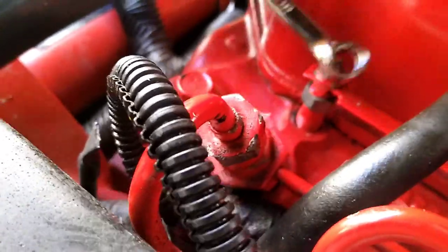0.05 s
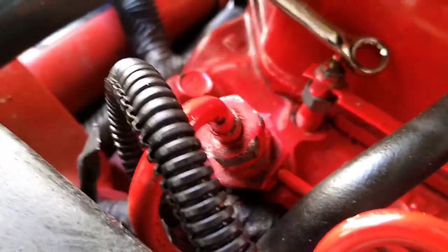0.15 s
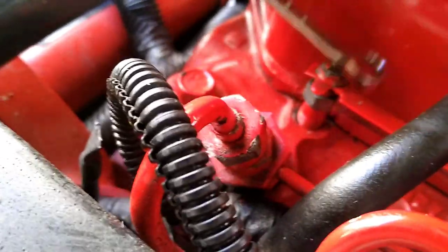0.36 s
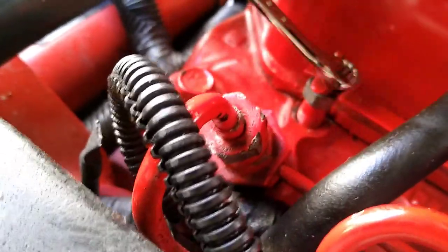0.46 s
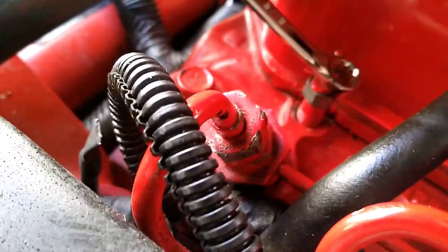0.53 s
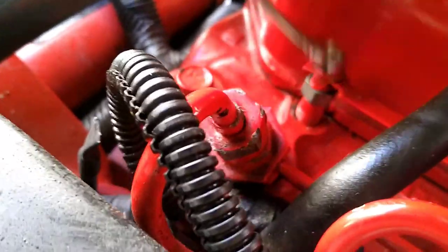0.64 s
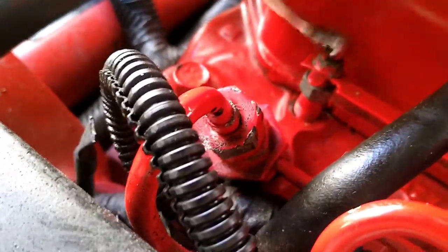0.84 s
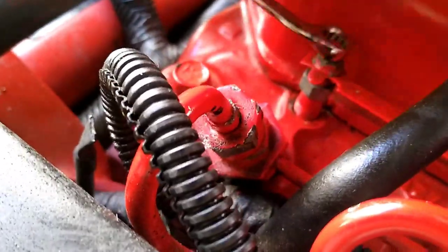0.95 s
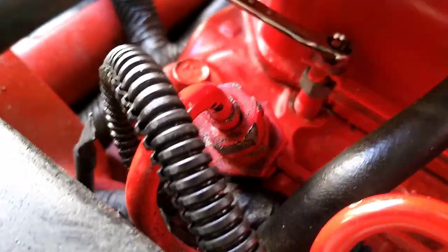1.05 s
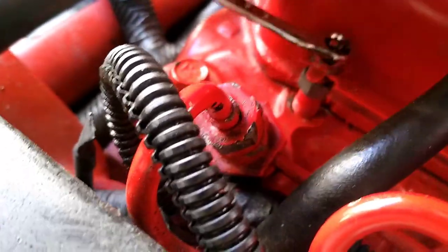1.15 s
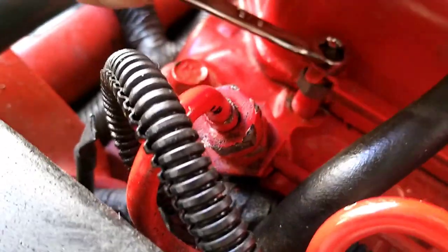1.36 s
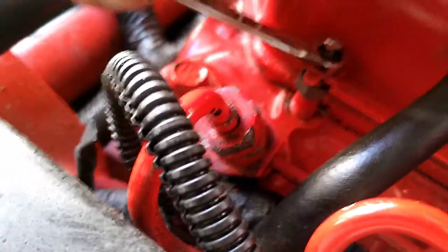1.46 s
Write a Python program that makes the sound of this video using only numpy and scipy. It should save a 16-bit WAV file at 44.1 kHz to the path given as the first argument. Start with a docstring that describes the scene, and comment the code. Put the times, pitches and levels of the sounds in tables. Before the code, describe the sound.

Hand wrench clicking on an engine nut in a boat, heard close and fairly dry; the loudest hit comes early, two moderate taps follow, then barely audible fidgeting contacts over very faint low hum and hiss.

```python
"""A small steel wrench clicks and taps on a terminal nut of an engine in a boat's cramped engine bay.
Each touch is a short chatter of contacts that rings wrench and block; the hardest tap makes the hull boom.
In mono; the direct taps stand well above the bay's brief dense tail, as from a microphone close by.
A faint low hum, rumble and microphone hiss lie underneath; the recorder cuts the top."""
import sys
import numpy as np
from scipy import signal
from scipy.fft import rfft, irfft
from scipy.io import wavfile

SR = 44100
rng = np.random.default_rng(int(sys.argv[2]) if len(sys.argv) > 2 else 0)


def output_pcm(signal):
    """Save a mono or channel-first signal as 16-bit PCM at the path in sys.argv[1].

    Samples are clipped to [-1, 1] before scaling.
    """
    pcm = np.clip(np.atleast_2d(signal).T, -1, 1) * 32767
    wavfile.write(sys.argv[1], SR, np.round(pcm).astype(np.int16))


def ratio_of_db(decibels):
    """Turn decibels (scalar or array-like) into linear amplitude factors; 0 dB maps to 1."""
    return 10 ** (np.asarray(decibels, float) / 20)


N = 66150  # 1.5 s


def rms_one(x):
    """Scales a signal to an rms of one."""
    return x / np.sqrt(np.mean(x ** 2) + 1e-20)


def at_hz(points, hz):
    """Reads a (Hz, value) curve along log frequency."""
    points = np.array(points)
    return np.interp(np.log(hz), np.log(points[:, 0]), points[:, 1])


def dying(t, t60):
    """Exponential decay that falls 60 dB in t60 seconds."""
    return ratio_of_db(-60 * t / t60)


def bands(x, gain_db):
    """Third-octave bank; x(hz) gives each band's input, gain_db(hz) its gain."""
    edges = 160 * 2 ** np.arange(0, 6.1, 1 / 3)
    total = 0
    for low, high in zip(edges, edges[1:]):
        centre = np.sqrt(low * high)
        band = signal.butter(1, [low, high], "band", fs=SR, output="sos")
        total = total + ratio_of_db(gain_db(centre)) * signal.sosfilt(band, x(centre))
    return total


def tilt_db(hz, dull_db, treble_db):
    """Colour of one touch: a slope per octave about 5 kHz and a treble shelf from 5750 Hz."""
    return -dull_db * np.log2(hz / 5000) + treble_db / (1 + (5750 / hz) ** 6)


# Colour of the contact noise before each touch's own tilt: pitch_hz, level_db
CRACK_COLOUR = [(200, -26), (500, -26), (1000, -16), (1500, -10.5), (3000, -3), (4800, -1), (6200, -9.5),
                (7300, -9), (8500, -12.5)]


def crack(t, dull_db, treble_db, chatter_ms, tail_db):
    """Dying chatter of random contacts, plus shimmer from modes too dense to tell apart; peak 1."""
    contacts_per_s, first_contact = 2500, 3
    shimmer_db, shimmer_t60_s, shimmer_rise_s = -19, 0.1, 0.002
    contacts = rng.random(len(t)) < contacts_per_s / SR
    chatter = rng.standard_normal(len(t)) * contacts * np.exp(-1000 * t / chatter_ms)
    chatter[0] = first_contact
    shimmer = rng.standard_normal(len(t)) * (1 - np.exp(-t / shimmer_rise_s)) * dying(t, shimmer_t60_s)
    # the tiny constant keeps the input from being exactly zero
    source = chatter / first_contact + ratio_of_db(shimmer_db + tail_db) * shimmer + 1e-18
    noise = bands(lambda hz: source, lambda hz: at_hz(CRACK_COLOUR, hz) + tilt_db(hz, dull_db, treble_db))
    return noise / np.abs(noise).max()


# Ringing modes of wrench and block, before tilt and scatter: pitch_hz, level_db, late_t60_s
STEEL_MODES = [(612, -23, 0.1463), (1480, -24, 0.14), (1722, -36.5, 0.27), (2230, -20, 0.033),
               (2540, -26, 0.18), (3040, -18, .065), (3402, -16, .07), (3700, -18, .08), (4100, -17, .06),
               (4400, -17.5, 0.065), (4870, -6.5, 0.053), (5300, -12.5, .07), (5810, -10, 0.017),
               (6215, -7, .075), (6600, -9.5, .06), (7180, -14.5, 0.084), (7322, -11.5, 0.019)]


def ring(t, favoured_hz, extra_db, dull_db, treble_db, tail_db):
    """Modes drop fast at first, damped by the grip, then ring on, most of all near favoured_hz."""
    early_t60_s, late_db = 0.022, -8
    reach_octaves, scatter_db, split = 0.035, 2.5, 0.011  # split: spread as a fraction of pitch
    hz, level_db, late_t60_s = np.transpose(STEEL_MODES)[:, :, None]
    favour = np.exp(-(np.log2(hz / favoured_hz) / reach_octaves) ** 2)
    late_level_db = late_db + tail_db + extra_db * favour
    level_db = level_db + tilt_db(np.maximum(hz, 2000), dull_db, treble_db)
    level_db = level_db + scatter_db * rng.standard_normal(hz.shape)
    # each mode is a close cluster of three: one at its pitch, two beside it
    offset_hz = split * hz * rng.standard_normal((3, *hz.shape)) * [[[0]], [[1]], [[1]]]
    phase = 2 * np.pi * rng.random((3, *hz.shape))
    partners = np.sin(2 * np.pi * (hz + offset_hz) * t + phase)
    clusters = np.sum(partners * [[[1]], [[0.55]], [[0.4]]], axis=0)
    decay = dying(t, early_t60_s) + ratio_of_db(late_level_db) * dying(t, late_t60_s)
    onset = 1 - np.exp(-t / 0.00025)
    return np.sum(ratio_of_db(level_db) * decay * clusters, axis=0) * onset


def tap(favoured_hz, extra_db, dull_db, treble_db, chatter_ms, tail_db):
    """One touch: crack and ring together, choked by the hand on the wrench; peak 1."""
    ring_db, grip_s = -10.5, 0.11
    t = np.arange(SR // 3) / SR
    noise = crack(t, dull_db, treble_db, chatter_ms, tail_db)
    modes = ring(t, favoured_hz, extra_db, dull_db, treble_db, tail_db)
    both = (noise + ratio_of_db(ring_db) * modes) * np.exp(-(t / grip_s) ** 3)
    return both / np.abs(both).max()


# Touches of the wrench: start_s, level_db (peak of the direct sound), favoured_hz (mode left ringing),
# extra_db (its added late level), dull_db (per octave, less treble if positive), treble_db (shelf),
# chatter_ms (decay constant), tail_db (lift of shimmer and late ringing)
TOUCHES = [(.1216, -47.5, 1720, 33, 9, 3, 1.7, -4.5), (.178, -51, 3040, 18.5, 20, 23, 1.9, 6),
           (.1859, -30.5, 1720, 22, 6, -0.5, 1.5, -1), (0.188, -35.5, 6600, 18.5, 4, -15, 2.5, -8),
           (0.229, -9, 1480, 14.5, -1.5, 9, 4.8, 2.6), (.527, -53, 7140, 0, 6.9, -5.5, 3.9, 6.3),
           (0.5343, -26.5, 3040, 8, 3, 0, 8, -0.2), (0.792, -65, 2230, 5.5, 5, -7, 2.9, -2),
           (0.8512, -60.5, 4100, 9, 17.4, -8.5, 1.7, -7.5), (.8514, -27, 1480, 13, -1.6, -1.5, 4.5, -7),
           (.9767, -55, 2230, 9.5, 10, -14.5, 2.25, -8), (.981, -58, 7260, 18.5, 2.8, -29, 11, 8.5),
           (1.004, -62, 2230, 11, 15, -23, 2.4, -6), (1.0532, -56.5, 4400, 6.5, 10, -9.5, 4, -2.5),
           (1.1036, -52.5, 3040, 22, 1.8, -37, 3.7, 4), (1.141, -60.5, 5300, 9, 5, -18, 7.8, -2),
           (1.165, -58.5, 3700, 6.5, 11, -13.5, 5, -2), (1.3295, -44, 4870, 4.5, 12, -3.5, 7.5, -6),
           (1.484, -62.5, 3040, 7.5, 5.5, -16.5, 8, -2)]


def wrench():
    """Lays every touch at its time, each with its own strength and colour."""
    out = np.zeros(N + SR)
    for start_s, level_db, *colour in TOUCHES:
        start = int(start_s * SR)
        out[start:start + SR // 3] += ratio_of_db(level_db) * tap(*colour)
    return out[:N]


# Low modes of the hull: pitch_hz, level_db (before the slow rise), t60_s
HULL_MODES = [(56, -40, .2), (108, -57.5, 0.17), (174.4, -52, 0.45), (283.7, -44.5, 0.17), (432, -59, 0.3)]


def thud():
    """Low boom of the hull after the hardest tap: sines that swell quickly and die away."""
    start_s, rise_s = 0.232, 0.015
    t = np.maximum(np.arange(N) / SR - start_s, 0)
    boom = sum(ratio_of_db(level_db) * dying(t, t60_s) * np.sin(2 * np.pi * hz * t)
               for hz, level_db, t60_s in HULL_MODES)
    return (1 - np.exp(-t / rise_s)) * boom


# How long the engine bay holds each pitch: pitch_hz, t60_s
BAY_DECAY = [(400, 0.45), (1500, 0.12), (4000, 0.042), (8000, 0.033)]


def bay(x):
    """Dense reflections: noise that builds over a few milliseconds and dies band by band."""
    t = np.arange(SR // 2) / SR
    white = rng.standard_normal(len(t)) * (1 - np.exp(-t / 0.0067))
    tail = bands(lambda hz: white * dying(t, at_hz(BAY_DECAY, hz)), lambda hz: 0)
    return signal.fftconvolve(x, tail / np.linalg.norm(tail))[:N]


# Wavering low tones: pitch_hz, width_hz, level_db (rms, before the bass roll-off)
HUM_TONES = [(72.6, 8, -67.5), (90, 5.1, -71.5), (102, 10, -70.5), (179.2, 3.4, -72.5), (245, 36, -72.5)]


def hum():
    """One steady low tone, and wavering ones: noise through narrow resonances."""
    steady_hz, steady_db = 54.5, -65.5
    out = ratio_of_db(steady_db) * rms_one(np.sin(2 * np.pi * steady_hz * np.arange(N) / SR))
    for hz, width_hz, level_db in HUM_TONES:
        r = np.exp(-np.pi * width_hz / SR)
        resonance = [1, -2 * r * np.cos(2 * np.pi * hz / SR), r * r]
        tone = signal.lfilter([1, 0, -1], resonance, rng.standard_normal(2 * N))
        out = out + ratio_of_db(level_db) * rms_one(tone[N:])  # the first half lets the resonance settle
    return out


# Colour of rumble and hiss: pitch_hz, level_db (relative, per Hz)
FLOOR_COLOUR = [(15, -32), (25, -15.5), (81, -2), (194, -13.5), (225, -22), (502, -15), (625, -25),
                (724, -14.5), (818, -22), (6820, -44.5), (8500, -58), (11000, -87), (18700, -120)]
# Slow swell of rumble and hiss: time_s, lift_db
FLOOR_SWELL = [(0, 1.7), (.3, 2.14), (.45, 2.7), (.7, 1.2), (1.5, 0)]


def floor():
    """Rumble and microphone hiss: noise coloured in the spectrum, its level swelling a little."""
    floor_db = -68.5  # rms before the swell
    hz = np.maximum(np.fft.rfftfreq(N, 1 / SR), 1)
    spectrum = rfft(rng.standard_normal(N)) * ratio_of_db(at_hz(FLOOR_COLOUR, hz))
    lift_db = np.interp(np.arange(N) / SR, *np.transpose(FLOOR_SWELL))
    return ratio_of_db(floor_db + lift_db) * rms_one(irfft(spectrum, N))


def scene():
    """Wrench, its tail in the bay, the hull's boom and the background, in mono."""
    bay_db = -22.5
    taps = wrench()
    mix = taps + ratio_of_db(bay_db) * bay(taps) + thud() + hum() + floor()
    return mix[None]


def roll_off(x):
    """The treble ends steeply here."""
    return signal.sosfilt(signal.butter(12, 8790, fs=SR, output="sos"), x)


def record(dry):
    """Microphone's bass roll-off, the recorder's steep top cut and faint dither."""
    mic_low_hz, cut_hz, dither_db = 43, 8700, -91
    x = signal.sosfilt(signal.butter(4, mic_low_hz, "high", fs=SR, output="sos"), dry)
    x = signal.sosfilt(signal.cheby2(14, 60, cut_hz, fs=SR, output="sos"), x)
    mix = x + ratio_of_db(dither_db) * rng.standard_normal(x.shape)
    return roll_off(mix)


dry = scene()
out = record(dry)
output_pcm(out)
```